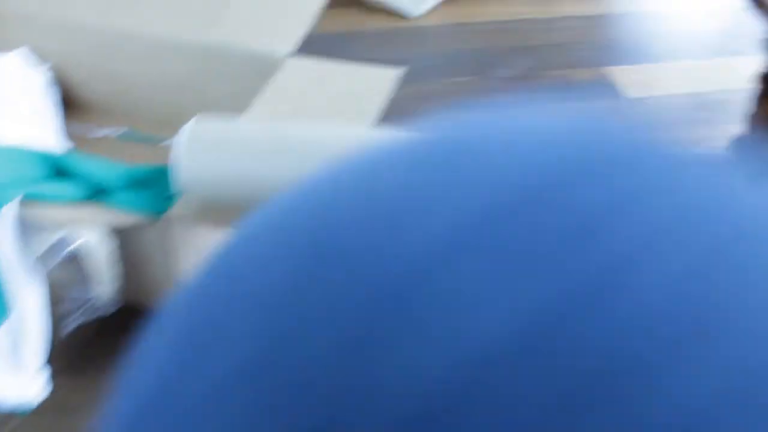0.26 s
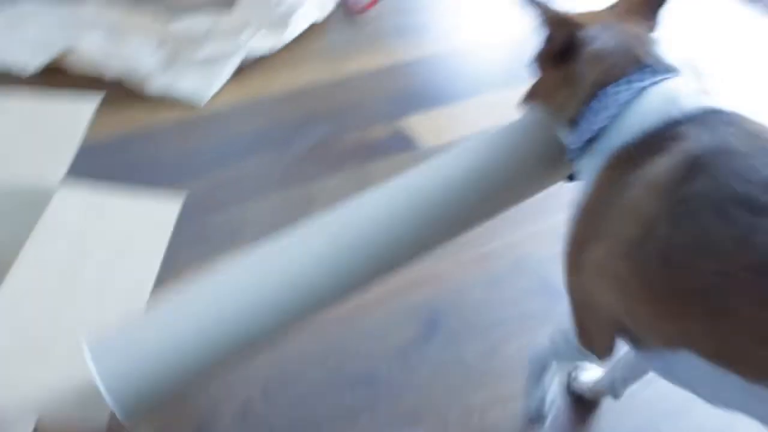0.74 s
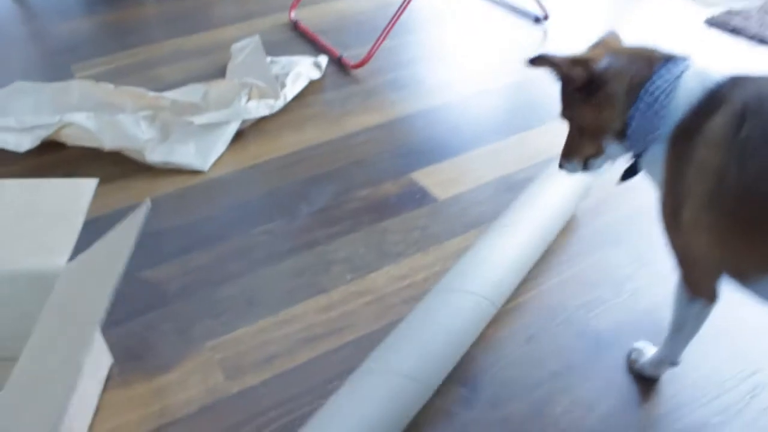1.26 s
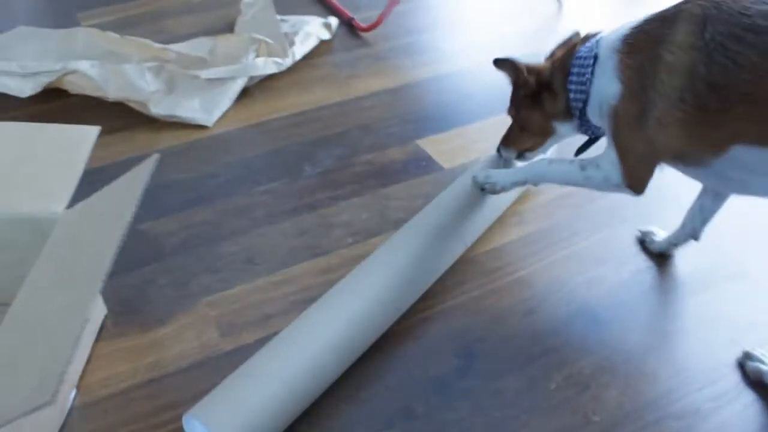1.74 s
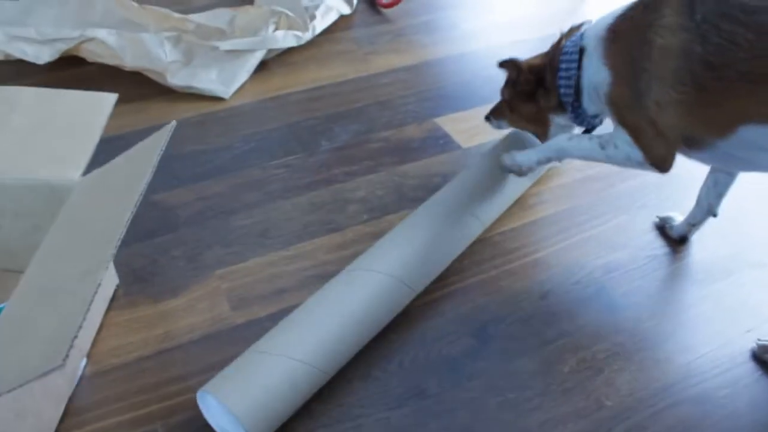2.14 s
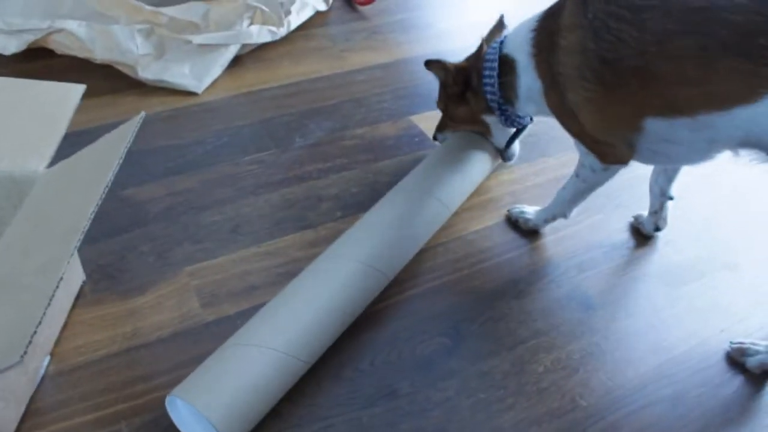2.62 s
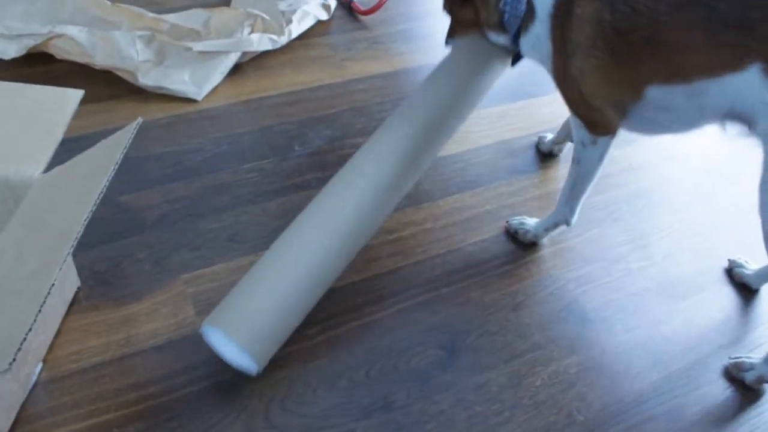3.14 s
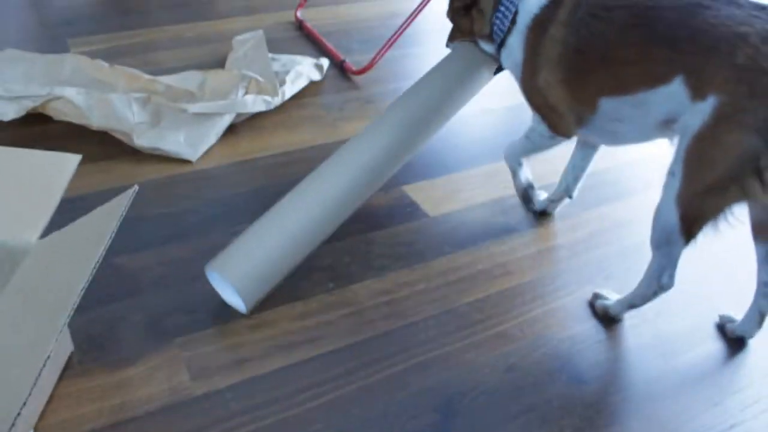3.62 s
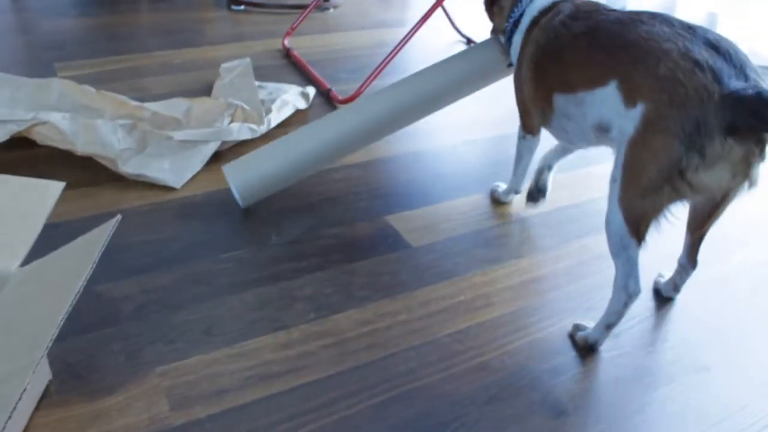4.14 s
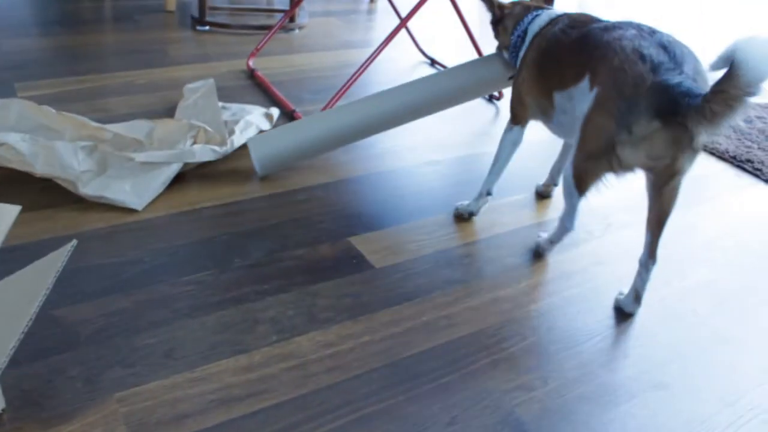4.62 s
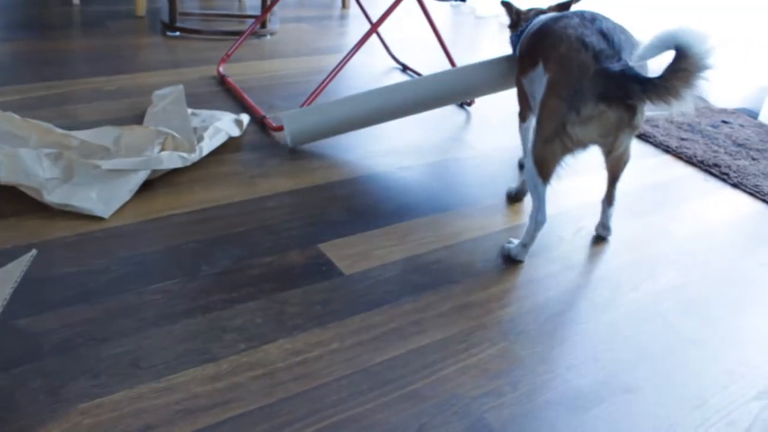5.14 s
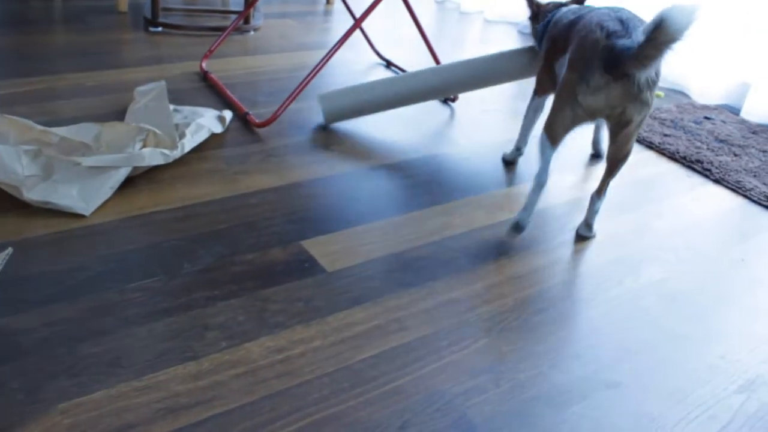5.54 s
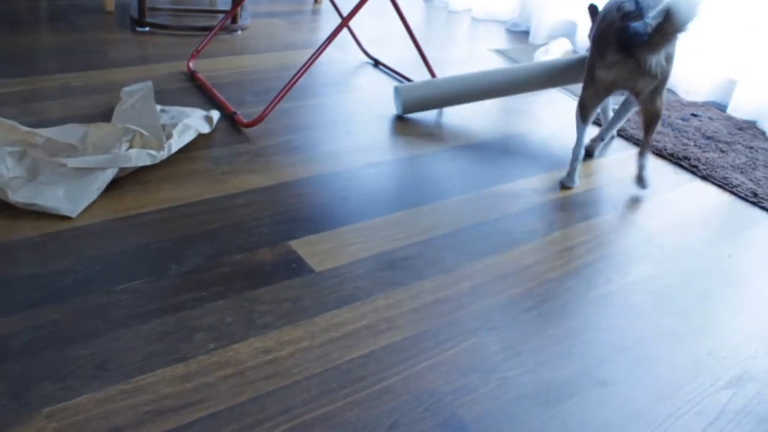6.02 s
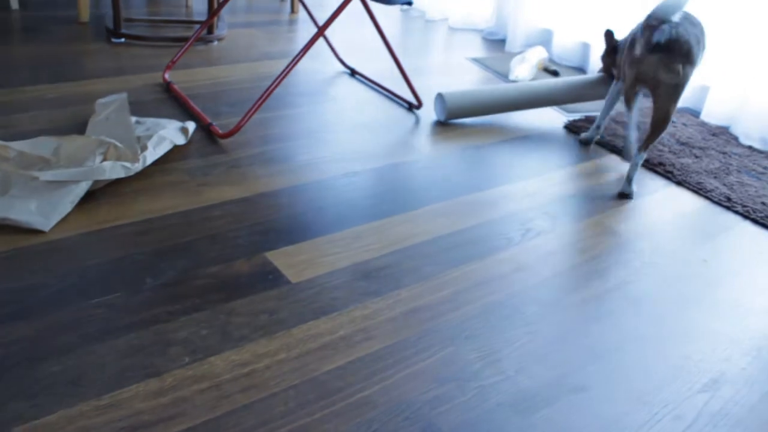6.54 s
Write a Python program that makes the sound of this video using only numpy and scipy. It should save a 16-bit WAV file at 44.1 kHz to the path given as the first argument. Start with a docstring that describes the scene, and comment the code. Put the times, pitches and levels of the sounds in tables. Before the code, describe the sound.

A dog pulls a cardboard tube off a box and drags it across a wooden floor, with hollow knocks, scraping and claw ticks.

```python
"""A live room with a wooden floor: a dog pulls a cardboard tube off a box, drops it, paws at it and
drags it away. The hollow tube rings at every knock and hums while its rim scrapes along. Box flaps
drone, floorboards rumble, claws and teeth tick and scuff, and something small and hard clinks once.
The room answers each blow, and the nearest ones overload the microphone."""
import sys
import numpy as np
from scipy import signal
from scipy.fft import rfft, irfft
from scipy.io import wavfile
from scipy.ndimage import map_coordinates

SR = 44100
rng = np.random.default_rng(int(sys.argv[2]) if len(sys.argv) > 2 else 0)


def digitize_waveform(pressure):
    """Quantize a signal to 16-bit integers and store it at the path in sys.argv[1].

    Rows of a 2-D input are taken as channels; values are limited to [-1, 1].
    """
    field = np.atleast_2d(pressure).T
    bounded = np.clip(field, -1, 1)
    quanta = np.round(bounded * 32767).astype(np.int16)
    wavfile.write(sys.argv[1], SR, quanta)


N = 298557
TIME = np.arange(N) / SR


def gain_of(db):
    """Decibels to amplitude."""
    return 10 ** (np.asarray(db) / 20)


def unit_rms(x):
    """Scales to rms 1."""
    return x / np.sqrt(np.mean(x ** 2) + 1e-20)


def burst_energy(x, decay_s):
    """Scales x to the energy of unit noise decaying over decay_s."""
    return x / np.linalg.norm(x) * np.sqrt(decay_s * SR / 2)


def lookup(points, hz):
    """Interpolates a table over log frequency."""
    points_hz, values = np.transpose(points)
    return np.interp(np.log(hz + 1), np.log(points_hz + 1), values)


def add(mix, start_s, sound):
    """Mixes a sound in at start_s."""
    part = mix[max(round(start_s * SR), 0):][:len(sound)]
    part += sound[:len(part)]


def envelope(times_s, levels_db, rise_s, fall_s):
    """Gain curve with exponential skirts outside its points."""
    outside = np.maximum(times_s[0] - TIME, 0) / rise_s + np.maximum(TIME - times_s[-1], 0) / fall_s
    return gain_of(np.interp(TIME, times_s, levels_db)) * np.exp(-outside)


def filtered(x, hz, kind, order):
    """Low-pass or high-pass."""
    return signal.sosfilt(signal.butter(order, min(hz, SR * .45), kind, fs=SR, output="sos"), x)


def band(x, hz, spread):
    """Soft band from hz / spread to hz * spread, spread at least 1.05; rms 1."""
    spread = max(spread, 1.05)
    edges_hz = [hz / spread, min(hz * spread, SR * .45)]
    return unit_rms(signal.sosfilt(signal.butter(2, edges_hz, "band", fs=SR, output="sos"), x))


def coloured(x, spectrum):
    """Shapes x by a spectrum; rms 1."""
    gains = gain_of(lookup(spectrum, np.fft.rfftfreq(N, 1 / SR)))
    return unit_rms(irfft(rfft(x) * gains, N))


def resonate(x, modes):
    """Body resonances driven by x; rms 1."""
    return unit_rms(sum((-1) ** k * gain_of(db) * signal.lfilter(*signal.iirpeak(hz, hz / width, SR), x)
                        for k, (hz, width, db) in enumerate(modes)))


def ring(modes, t60_s, t):
    """Struck modes; the place of the blow shifts them and favours some."""
    hz, db = np.transpose(modes)[:, :, None]
    hz = hz * rng.uniform(.985, 1.015, hz.shape)
    sign = (-1) ** np.arange(len(modes))[:, None]
    strength = sign * gain_of(db + rng.standard_normal(hz.shape))
    return (strength * np.exp(-np.log(1000) * t / t60_s) * np.sin(2 * np.pi * hz * t)).sum(0)


def judder(depth_db, rate_hz):
    """Random gain of an unsteady contact pressure."""
    return gain_of(depth_db * unit_rms(filtered(rng.standard_normal(N), rate_hz, "low", order=2)))


def friction(catches_per_s, size_db, judder_db, judder_hz):
    """Fibres catch and release in tiny uneven clicks under juddering pressure."""
    catches = (rng.random(N) < catches_per_s / SR) * rng.standard_normal(N)
    sizes = gain_of(size_db * np.minimum(rng.exponential(1, N), 4))
    return unit_rms(catches * sizes * judder(judder_db, judder_hz))


def crush(t, decay_s):
    """Crushed fibres: a dying, pitchless spray of clicks."""
    spray = rng.standard_normal(len(t)) * np.exp(-t / decay_s)
    for _ in range(4):
        whitened = irfft(np.exp(1j * np.angle(rfft(spray))), len(t))
        spray = whitened * np.exp(-(t / decay_s / 4) ** 2)
    return spray


# Still air: freq_hz, density_db
AIR_SPECTRUM = [(30, 3.5), (100, -3), (240, 3.5), (500, -4.5), (1500, -2), (4000, -10.5), (7000, -12.5),
                (12000, -19)]

def air(level_db=-73):
    """Faint steady noise of the room."""
    return gain_of(level_db) * coloured(rng.standard_normal(N), AIR_SPECTRUM)


# Room decay: freq_hz, t60_s
ROOM_DECAY = [(100, 0.74), (300, 0.5), (1000, 0.5), (3000, 0.41), (5000, 0.52), (8000, 0.46), (12000, 0.57)]
# Reflection colour: freq_hz, gain_db
ROOM_SPECTRUM = [(40, -10.5), (120, -10), (300, 0), (1000, -1.5), (3000, 0), (5000, -0.5), (6500, -6),
                 (12000, 1)]

def room_tail(gap_s=.0033, build_s=.00033):
    """Dense reflections after a short gap, each band dying at its own rate."""
    hz, t, bands = signal.stft(rng.choice([-1., 1.], SR), SR, nperseg=256)
    bands = bands * np.exp(-np.log(1000) * t / lookup(ROOM_DECAY, hz)[:, None])
    bands *= gain_of(lookup(ROOM_SPECTRUM, hz))[:, None]
    onset = 1 - np.exp(-np.maximum(TIME[:SR] - gap_s, 0) / build_s)
    return signal.istft(bands, SR, nperseg=256)[1][:SR] * onset


def room(x, tails=4, glide_s=.17, gain_db=-27.5):
    """Dog and microphone keep moving, so the reflections glide from one tail to the next."""
    out = np.zeros(N)
    for k in range(tails):
        distance = np.abs((TIME / glide_s - k + tails / 2) % tails - tails / 2)
        crossfade = np.cos(np.pi / 2 * np.minimum(distance, 1))
        out += signal.oaconvolve(x * crossfade, room_tail())[:N]
    return gain_of(gain_db) * out


# Metal modes: pitch_hz, gain_db, unused_t60_s
CLINK_MODES = [(4674, -1, 1.2), (6100, -11.5, 0.49), (7100, -13.5, 0.52)]

def clink(start_s=1.8345, level_db=-57.5, t60_s=.41):
    """One thin metallic ring, probably from the collar."""
    out, t = np.zeros(N), np.arange(SR // 2) / SR
    modes = [(hz, db) for hz, db, _ in CLINK_MODES]
    add(out, start_s, gain_of(level_db) * ring(modes, t60_s, t))
    return out


def bounces(start_s=.94, level_db=-34, centre_hz=1750, gap_s=.046, gap_ratio=.74, loss_db=2.5):
    """Tick rows for the dropped tube settling, each bounce sooner and weaker."""
    return [(start_s + gap_s * sum(gap_ratio ** np.arange(k)), level_db - loss_db * k, centre_hz)
            for k in range(4)]


# Claws and teeth on cardboard and wood: start_s, level_db, centre_hz
CLAW_TICKS = [(0.224, -24.5, 1770), (0.244, -20.5, 3270), (0.277, -23.5, 1950), (0.379, -41, 4000),
              (1.2826, -46.5, 2830), (1.3377, -53.5, 1930), (1.433, -57.5, 2025), (1.4969, -51.5, 2690),
              (2.0047, -49, 3970), (2.1515, -46, 1984), (2.3354, -50, 1790), (2.402, -40, 3900),
              (3.614, -41, 4800), (4.248, -35, 9750), (5.32, -32, 4500)]

def ticks(decay_s=.0032, click_db=-13):
    """Short hard touches of claws, teeth and the settling tube, each topped by a tight click."""
    out, t = np.zeros(N), np.arange(SR // 20) / SR
    for start_s, level_db, centre_hz in CLAW_TICKS + bounces():
        grit = crush(t, decay_s)
        tick = band(grit, centre_hz, spread=1.53) + gain_of(click_db) * unit_rms(grit)
        add(out, start_s, gain_of(level_db) * burst_energy(tick, decay_s))
    return out


# Paw brushes, cardboard rubs, rim catches: peak_s, level_db, centre_hz, spread_ratio, rise_s, fall_s
SCUFF_STROKES = [(0.362, -22.5, 321.5, 0.92, 0.032, 0.014), (0.375, -29, 2600, 1.8, 0.056, 0.0041),
                 (0.598, -38.5, 4000, 1.56, 0.022, 0.01), (1.072, -62.5, 8000, 1.42, 0.007, 0.026),
                 (1.524, -62.5, 1280, 1.94, 0.019, 0.045), (1.583, -51.5, 3800, 2.6, 0.0066, 0.016),
                 (1.77, -36, 2320, 2.05, 0.027, 0.005), (2.045, -48, 2315, 2.34, 0.029, 0.019),
                 (2.2, -67, 2900, 3, 0.3, .15), (2.8, -48, 905, 1.18, .025, 0.034),
                 (3.048, -38, 3240, 3.8, .002, 0.021), (3.25, -41.5, 863, 1.05, 0.021, 0.046),
                 (3.41, -45.5, 2940, 1.24, 0.2, 0.16), (3.640, -40, 3870, 1.52, 0.012, 0.012),
                 (4.251, -38, 10700, 1.1, .002, 0.023), (4.256, -41.5, 1580, 2.25, 0.0071, 0.078),
                 (4.805, -40.5, 4000, 1.42, 0.011, 0.014), (5.23, -24.5, 3200, 2.6, 0.0034, 0.0086),
                 (5.890, -50, 138, 1.34, 0.13, 0.11), (6.318, -45, 870, 0.72, 0.0092, 0.013)]

def scuffs(fizz_db=-20):
    """Brief friction strokes that swell and fade; the bright ones carry a fine fizz."""
    out = np.zeros(N)
    grains = friction(8100, size_db=-2, judder_db=0, judder_hz=92.8)
    for peak_s, level_db, centre_hz, spread, rise_s, fall_s in SCUFF_STROKES:
        fizz = gain_of(fizz_db) * grains * (centre_hz > 2000)
        out += envelope([peak_s], [level_db], rise_s, fall_s) * (band(grains, centre_hz, spread) + fizz)
    return out


# Tube sliding off the box: time_s, drone_db, rasp_db
SLIDE_LEVELS = [(0.0, -31, -42), (0.184, -36.5, -41.5), (0.258, -28.5, -39.5), (0.316, -34, -44.5),
                (0.364, -27, -34.5), (0.374, -28, -29), (0.398, -35.5, -49), (0.442, -55, -57),
                (0.47, -38.5, -56.5)]
# Box flap resonances: pitch_hz, width_hz, gain_db
FLAP_MODES = [(106, 340, -13), (202, 8.1, -0.5), (253, 19, -10.5), (339, 18, -1), (446, 28, -1),
              (582, 70, -6), (1040, 82, -26)]
# Cardboard on cardboard: freq_hz, density_db
SLIDE_SPECTRUM = [(300, -19.5), (800, 3), (1400, -6.5), (1900, -3), (3200, -3), (4800, -8.5), (6500, -10.5),
                  (11500, -11.5)]

def slide(drone_trim_db=-1, rasp_trim_db=7.5):
    """The tube rasps over the box edge and sets the flaps droning."""
    times_s, drone_db, rasp_db = np.transpose(SLIDE_LEVELS)
    grains = friction(6000, size_db=-1, judder_db=-1, judder_hz=70)
    drone = resonate(band(grains, hz=260, spread=2.1), FLAP_MODES)
    rasp = coloured(grains, SLIDE_SPECTRUM)
    return (drone * envelope(times_s, drone_db + drone_trim_db, rise_s=.01, fall_s=.032)
            + rasp * envelope(times_s, rasp_db + rasp_trim_db, rise_s=.01, fall_s=.072))


def moving_reflections(x, delays_s=(.0013, .0029), gain=.38):
    """Floor and wall paths change as the tube swings: a shifting comb."""
    out = x.copy()
    for delay_s in delays_s:
        swing = np.interp(TIME, np.linspace(0, TIME[-1], 30), rng.uniform(.8, 1.2, 30))
        out += gain * map_coordinates(x, [(TIME - delay_s * swing) * SR], order=3)
    return unit_rms(out)


# Rim on the floor: time_s, effort_db, grip_fraction (0 sliding, 1 catching)
DRAG_EFFORT = [(2.328, -52.5, 0.86), (2.901, -45.5, 0.71), (3.1, -46.5, 0.78), (3.25, -42, 0.49),
               (3.52, -44.5, 0.13), (3.74, -48, 0.42), (4.15, -48, 0.37), (4.45, -44.5, 0.54),
               (4.9, -50, 0.29), (5.19, -40.5, 0.17), (5.4, -50, 0.64), (5.63, -46.5, 0.73),
               (5.85, -54, 0.29), (5.98, -46, 0.53), (6.12, -51, 0.33), (6.3, -46, 0.69), (6.46, -52, 0.57),
               (6.53, -41.5, 0.83)]
# Scraped boards: freq_hz, density_db
RUMBLE_SPECTRUM = [(30, 9), (60, 7.5), (110, 7.5), (180, 5.5), (245, 10), (330, 7), (480, 6), (700, 3),
                   (1100, -52)]
# Rubbed tube resonances: pitch_hz, width_hz, gain_db
HUM_MODES = [(886.5, 47, 22.5), (935, 13, 0.5), (1050, 200, 4.5), (1090, 60, -12), (1460, 690, 0),
             (1503, 77, 7)]
# Rasping fibres: freq_hz, density_db
RASP_SPECTRUM = [(600, -12.5), (1200, 4.5), (1800, 2), (2300, 5.5), (3100, 6.5), (4100, -2), (5200, 0),
                 (6300, -14.5), (9000, -53)]
# Freely sliding rim: freq_hz, density_db
HISS_SPECTRUM = [(3500, -36.5), (6300, -2), (7800, 6), (9500, 6), (10600, 9.5), (12000, 2)]

def drag(rumble_rise_db_per_s=1.5):
    """The rim rasps over rumbling boards; catching, it sets the tube humming; sliding, it hisses."""
    times_s, effort_db, grip = np.transpose(DRAG_EFFORT)
    grains = friction(9000, size_db=2, judder_db=-.25, judder_hz=45)
    chatter = judder(depth_db=2.2, rate_hz=35) * band(grains, hz=1370, spread=4.37)
    rise_db = rumble_rise_db_per_s * (times_s - times_s[0])  # grows as the dog moves off
    voices = [(coloured(grains, RUMBLE_SPECTRUM), .49 * effort_db - 36 + rise_db),
              (resonate(chatter, HUM_MODES), effort_db - 14 + 19 * grip),
              (coloured(moving_reflections(grains), RASP_SPECTRUM), effort_db),
              (coloured(grains, HISS_SPECTRUM), effort_db + 1 - 11.5 * grip)]
    return sum(sound * envelope(times_s, db, rise_s=.051, fall_s=.13) for sound, db in voices)


def rim_crack(t, top_hz, hard_hz=5100, crush_cycles=16, snap_db=-17):
    """Fibres crush at the contact: a soft one lasts longer, a hard one snaps in the treble."""
    decay_s = crush_cycles / top_hz
    grit = filtered(crush(t, decay_s), 700, "high", order=1)
    snap = gain_of(snap_db) * min(top_hz / hard_hz, 1) ** 4 * grit
    return burst_energy(filtered(grit, top_hz, "low", order=3) + snap, decay_s)


# Struck hollow tube: pitch_hz, gain_db
TUBE_MODES = [(780, -13.5), (852, -5.5), (890, -7.5), (965, -9), (1204, -10.5), (1462, -9.5), (1620, -5.5),
              (1994, -7.5), (2313, -4.5), (3050, -4.5), (3765, -8.5), (5130, -13)]
# Struck floorboards: pitch_hz, gain_db
BOARD_MODES = [(125, -15), (175, -4), (215, -1.5), (244, 2), (315, -13), (380, -6.5), (445, -13),
               (520, -10.5), (600, -6)]

def blow(thump_db, thump_hz, tube_db, boards_db, crack_db, top_hz, hollow_hz=850, hollow_t60_s=.125):
    """The tube wall swings a cycle or two, the rim cracks, tube and boards ring."""
    t = np.arange(SR // 3) / SR
    swing_decay_s = .6 / thump_hz + .0008
    swing = -np.sin(2 * np.pi * thump_hz * t) * np.exp(-t / swing_decay_s)
    thump = gain_of(thump_db) * filtered(swing, thump_hz / 2, "high", order=1)  # small wall, little bass
    crack = gain_of(crack_db) * rim_crack(t, top_hz)
    modes_hz = np.array(TUBE_MODES)[:, :1]
    tube_t60_s = hollow_t60_s * (hollow_hz / modes_hz) ** 1.5  # cardboard damps high modes sooner
    tube = gain_of(tube_db) * ring(TUBE_MODES, tube_t60_s, t)
    boards = gain_of(boards_db) * ring(BOARD_MODES, t60_s=.08, t=t)
    body = filtered(thump + tube + boards, 2 * top_hz, "low", order=2)  # soft contact, round attack
    return crack + body


# Paws landing on the floor: start_s, thump_db, thump_hz
PAW_STEPS = [(1.656, -50, 381), (1.796, -43, 240), (2.093, -44, 344), (3.077, -40, 160), (5.933, -42, 198),
             (6.243, -61, 105)]
# Tube striking box, floor and chair:
# start_s, thump_db, thump_hz, tube_db, boards_db, crack_db, top_hz, send_db
TUBE_KNOCKS = [(0.4884, 4, 678, -16, -19, -10.5, 4240, -10), (.4900, -3, 271, -29, -45.5, -20, 8080, -9),
               (0.4999, -35, 870, -8, -34, -33, 503, -15), (0.6995, -5, 664, -15.5, -34, -20, 3900, -9.5),
               (0.7111, 19.5, 1592, -11, -31, 7.5, 6500, -31),
               (0.7257, -27.5, 1290, -28.5, -37, -11, 5500, -4),
               (0.865, -19, 872, -31.5, -40.5, -36.5, 2390, 0.5),
               (0.8737, -10, 856, -29.5, -51, -24.5, 3440, -5),
               (1.8342, -46, 604, -54, -60, -27.5, 9600, -5.5),
               (2.069, -26, 351, -43.5, -48.5, -41, 2930, -5),
               (3.0470, -27.5, 697, -30, -53, -50, 4940, -3),
               (4.5990, -6.5, 261, -37, -50, -14, 3970, -2.5),
               (4.5999, -4.5, 680, -22, -28, -23, 9300, -10),
               (5.2204, -3.5, 540, -53, -27, -19, 3330, -5.5),
               (5.2285, -14, 182, -37, -34, -11, 5100, -3.5), (6.5550, -4, 1750, -23, -55, -17.5, 2700, -4),
               (6.5606, -18.5, 140, -41, -37, -35, 2500, 1.5),
               (6.606, -14, 590, -25, -29, -34.5, 2100, -4.5)]

def knocks(paw_top_hz=2180, paw_send_db=7):
    """Tube blows and softer paw falls; returns direct sound and room send."""
    direct, send = np.zeros(N), np.zeros(N)
    paws = [(start_s, db, hz, db - 30, db - 12, db - 10.5, paw_top_hz, paw_send_db)
            for start_s, db, hz in PAW_STEPS]
    for start_s, *contact, send_db in TUBE_KNOCKS + paws:
        sound = blow(*contact)
        add(direct, start_s, sound)
        add(send, start_s, gain_of(send_db) * sound)
    return direct, send


def scene(scrape_db=-3, tick_send_db=-7, scuff_send_db=-6.5, scrape_send_db=-8.5):
    """Knocks, touches and scraping in the room, over still air."""
    knocking, send = knocks()
    ticking = ticks() + clink()
    scuffing = scuffs()
    scraping = gain_of(scrape_db) * (slide() + drag())
    send += gain_of(tick_send_db) * ticking
    send += gain_of(scuff_send_db) * scuffing
    send += gain_of(scrape_send_db) * scraping
    return (knocking + ticking + scuffing + scraping + room(send) + air())[None]


def record(dry, low_cut_hz=85, ceiling=.74, high_cut_hz=12080):
    """Microphone: bass cut, flat-topped overload, band limit."""
    thinned = filtered(dry, low_cut_hz, "high", order=2)
    clipped = thinned / (1 + (thinned / ceiling) ** 6) ** (1 / 6)
    band_limit = signal.firwin(255, high_cut_hz, window=("kaiser", 9), fs=SR)
    return signal.oaconvolve(clipped, band_limit[None], "same")


dry = scene()
out = record(dry)
digitize_waveform(out)
```